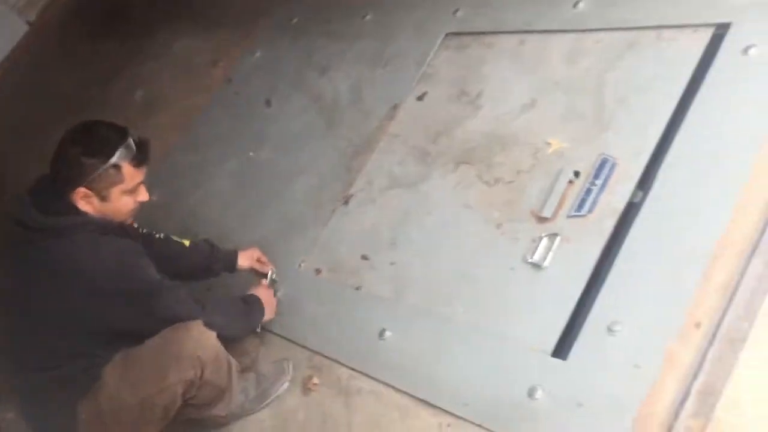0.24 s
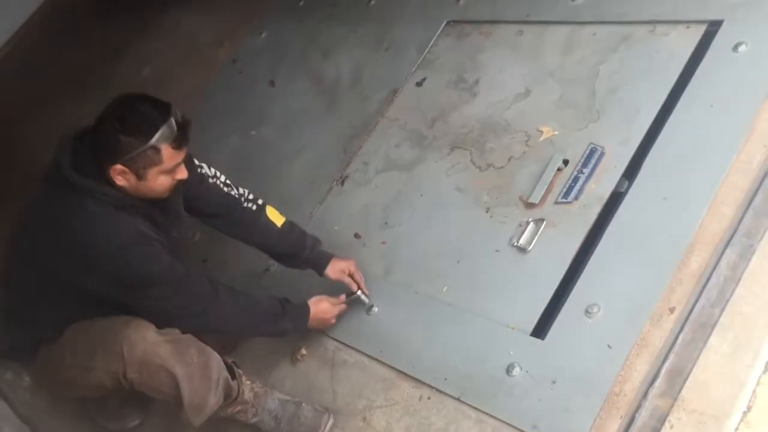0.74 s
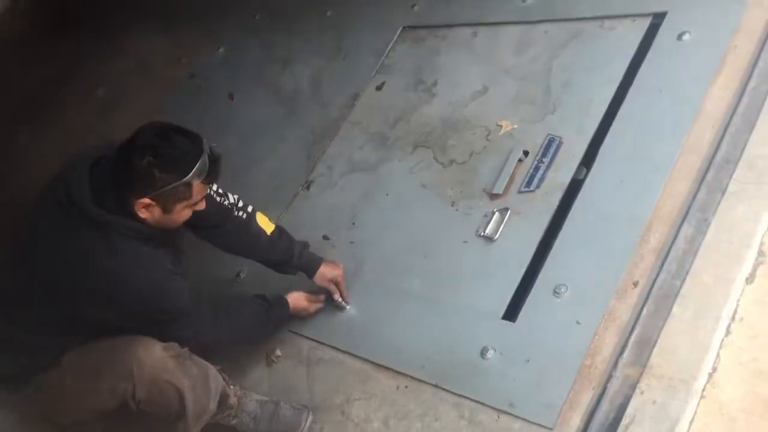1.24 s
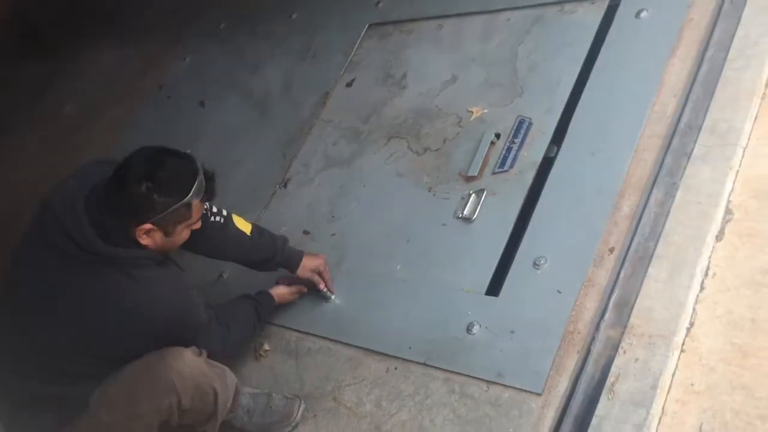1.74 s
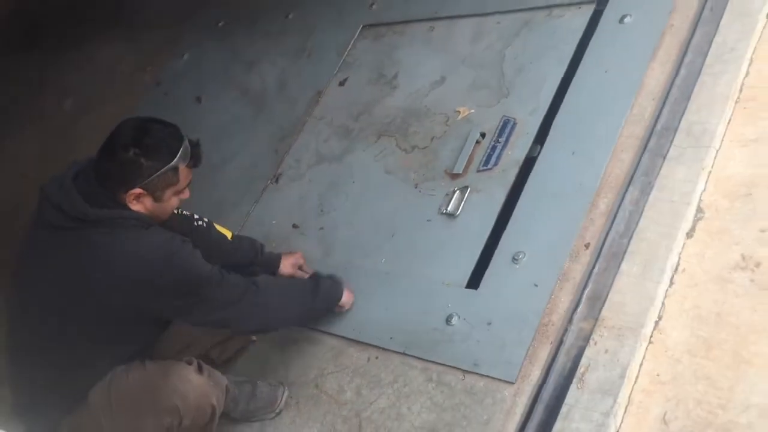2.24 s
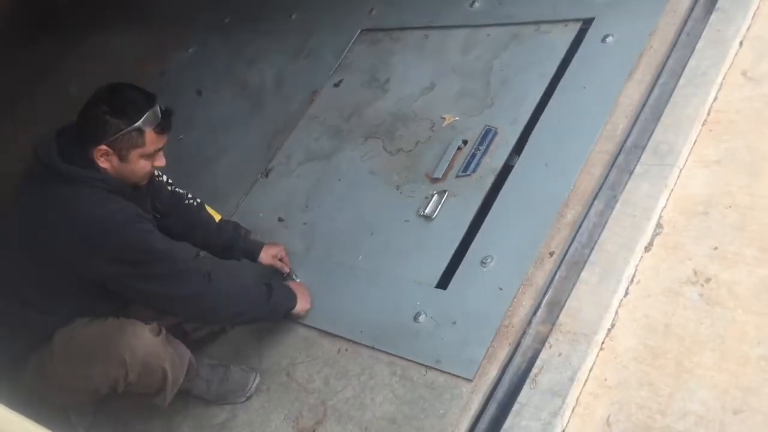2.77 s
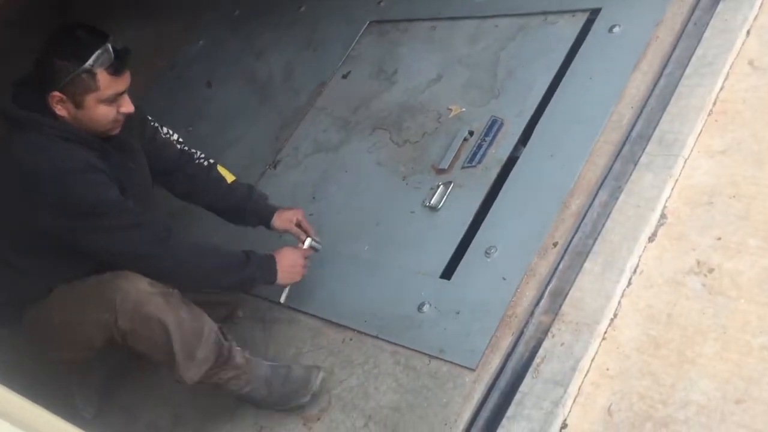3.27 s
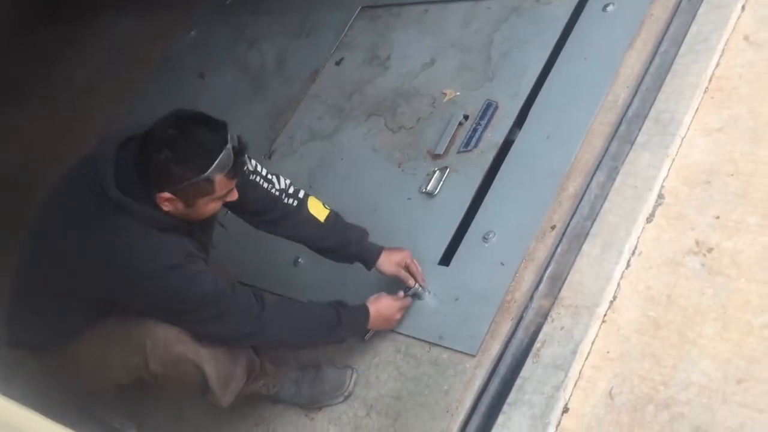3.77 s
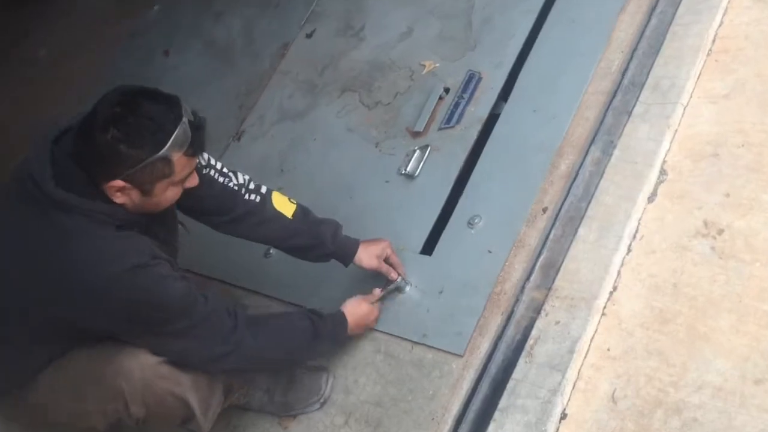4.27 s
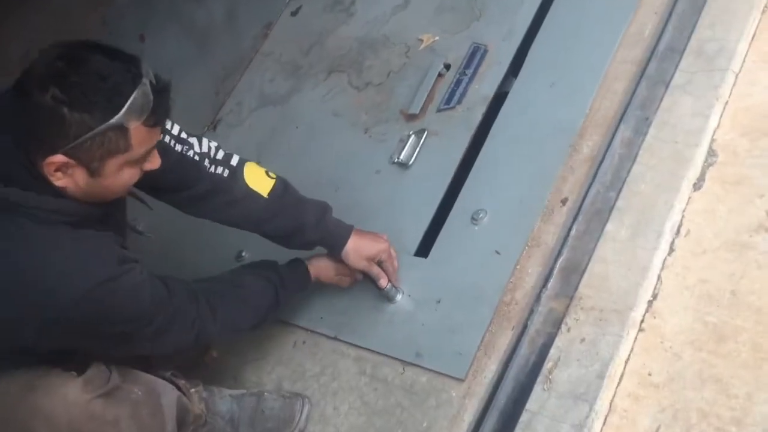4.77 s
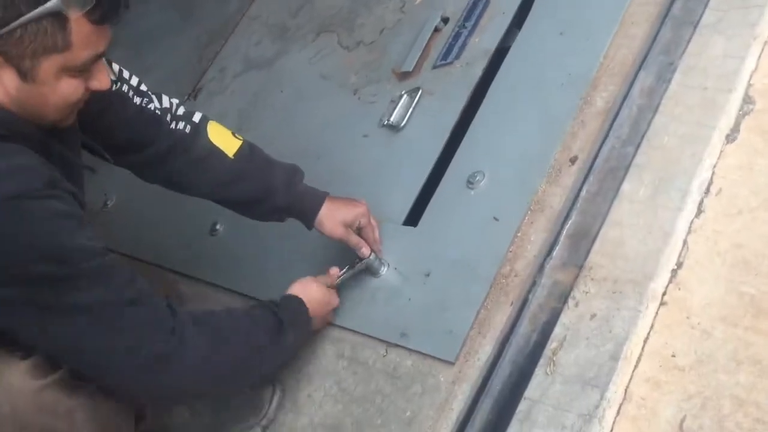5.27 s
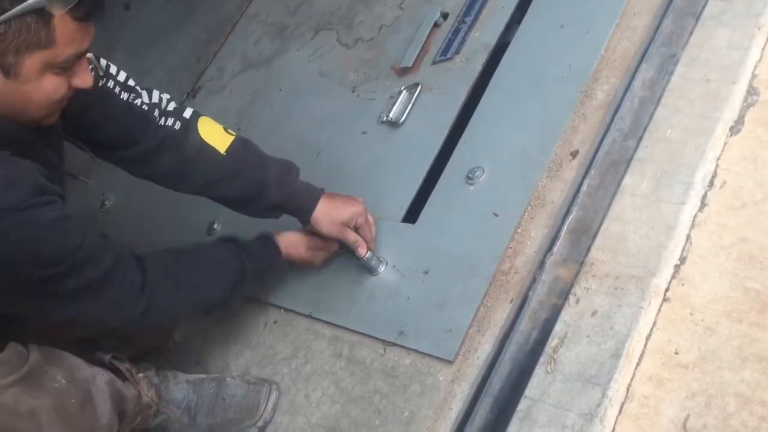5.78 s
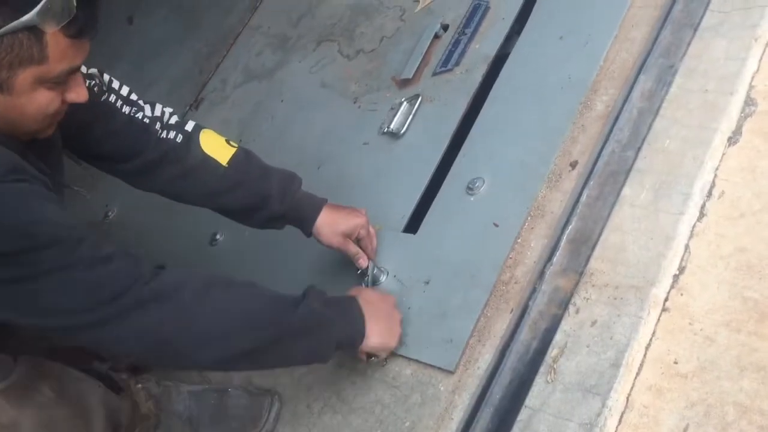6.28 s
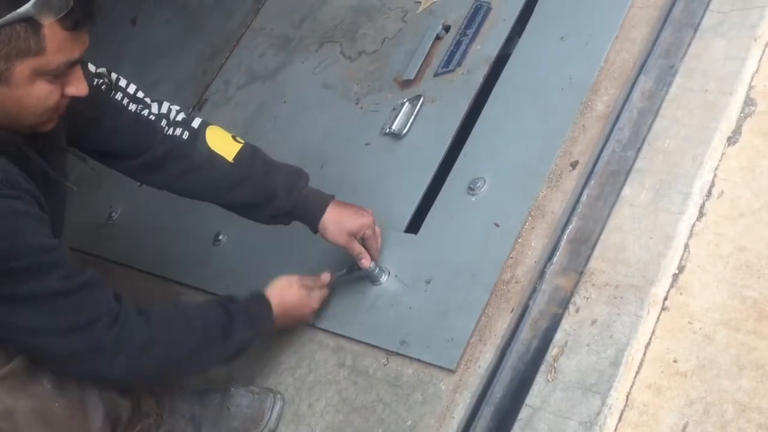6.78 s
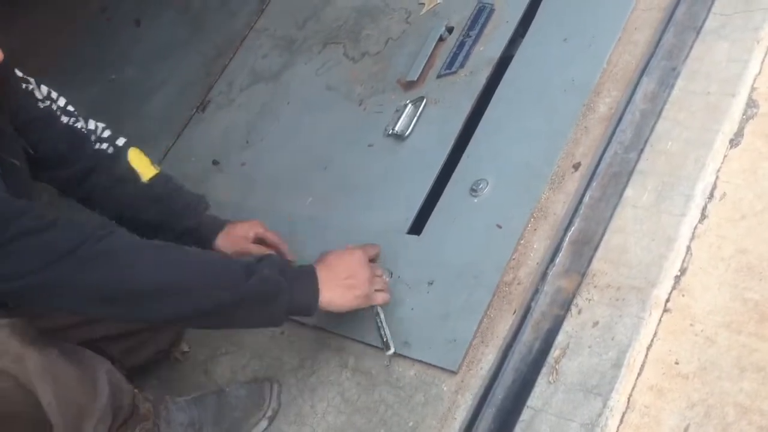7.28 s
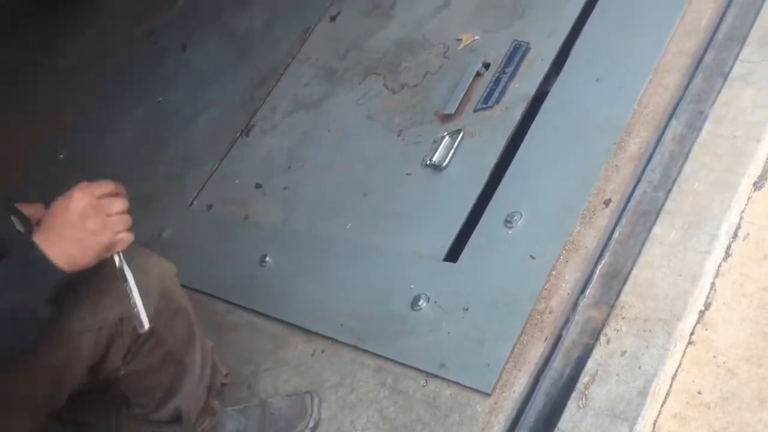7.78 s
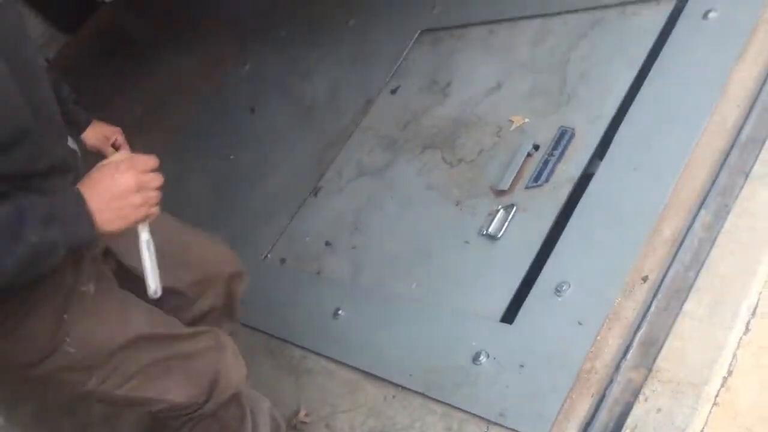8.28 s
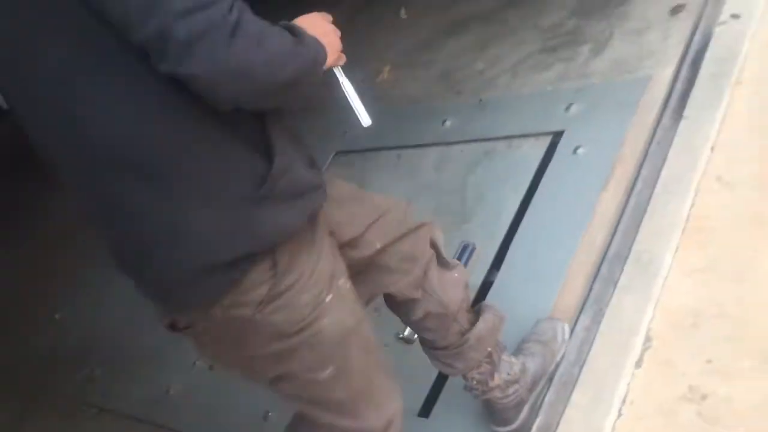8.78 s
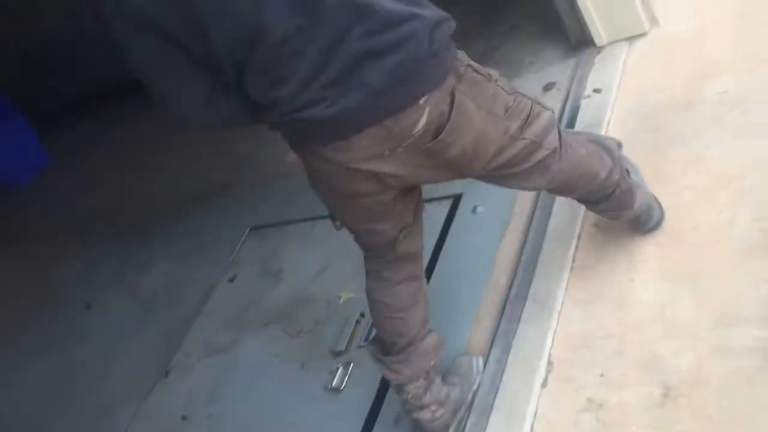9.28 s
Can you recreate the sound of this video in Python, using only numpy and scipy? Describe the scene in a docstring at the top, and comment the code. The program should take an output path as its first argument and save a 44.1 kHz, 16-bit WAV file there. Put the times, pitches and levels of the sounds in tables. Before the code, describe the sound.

In a garage, a hand ratchet loosens tight bolts on a steel floor lid. Soft fast ticking alternates with sudden ringing cracks and one short harsh squeak. Later pulls crack louder, creak roughly and give a clean brief squeal. The wrench clinks off, clothes rustle, grit scuffs and a boot lands. A nearby single microphone catches short bright reverberation and faint rumble.

```python
"""A ratchet wrench loosens tight bolts on a steel floor lid in a garage.
The pawl ticks on each back swing; in the pulls the threads crack, once with a short harsh squeak.
Later pulls crack again, then creak and squeak by stick-slip friction, and a clean squeal rings out.
Last the wrench clinks as it is lifted off, and the worker gets up with rustling clothes and footfalls.
Impacts are noise bursts through resonances; friction is jerky pulses or a wavering harmonic tone."""
import sys
import numpy as np
from scipy import signal
from scipy.fft import rfft, irfft, next_fast_len
from scipy.io import wavfile
from scipy.ndimage import map_coordinates

SR = 44100
rng = np.random.default_rng(int(sys.argv[2]) if len(sys.argv) > 2 else 0)


def master(y):
    """Save y as 16-bit WAV."""
    cut = np.clip(np.atleast_2d(y).T, -1, 1)
    pcm = np.round(cut * 32767)  # scale
    wavfile.write(sys.argv[1], SR, pcm.astype(np.int16))


N = 419832

# colour of grinding steel: frequency_hz, gain_db
GRINDING_COLOUR = [(300, -21), (1200, -13), (2400, -0.5), (4700, 3.5), (6800, -7.5), (9000, -16),
                   (15500, -38.5)]
# colour of a boot sole on the floor: frequency_hz, gain_db
SOLE_COLOUR = [(180, -61), (300, -5.5), (715, -8), (1200, -11), (3460, -14.5), (4330, -12.5), (6270, -43.5),
               (14000, -48)]


def amp(db):
    """Amplitude gain is ten to the power of decibels over twenty."""
    return 10 ** (np.asarray(db) / 20)


def unit(x):
    """Normalise the effective (rms) amplitude to 1."""
    return x / np.sqrt(np.mean(x ** 2) + 1e-20)


def along(points, hz):
    """Interpolate (frequency_hz, value) points on a logarithmic frequency axis."""
    point_hz, values = np.transpose(points)
    return np.interp(np.log(hz + 1), np.log(point_hz + 1), values)


def curves(rows):
    """Interpolate each column linearly in time, from the first row's time to the last."""
    row_s, *columns = np.transpose(rows)
    t = np.arange(row_s[0], row_s[-1], 1 / SR)
    return [np.interp(t, row_s, column) for column in columns]


def level(rows):
    """Gain over the whole scene, linear in decibels between (time_s, level_db) rows."""
    return amp(np.interp(np.arange(N) / SR, *np.transpose(rows)))


def wobble(rate, size):
    """Smooth random fluctuation: a spline through normal deviates, rate knots per second."""
    knots = rng.standard_normal(int(size * rate / SR) + 4)
    return map_coordinates(knots, [np.arange(size) * rate / SR])


def filtered(x, response):
    """Linear filtering: the spectrum is multiplied by a complex response of frequency."""
    padded = next_fast_len(len(x) + 4096)
    spectrum = rfft(x, padded) * response(np.fft.rfftfreq(padded, 1 / SR))
    return irfft(spectrum, padded)[:len(x)]


def noise(spectrum, size):
    """Random noise of rms 1, coloured by a (frequency_hz, gain_db) spectrum."""
    return unit(filtered(rng.standard_normal(size), lambda hz: amp(along(spectrum, hz))))


def resonance(f, centre, width):
    """Causal response of one damped mode; its bandwidth sets how fast it dies."""
    return 1j * f * width / (centre ** 2 - f * f + 1j * f * width)


def fade(t60, size, attack=0.00036):
    """Quick rise, then exponential decay by 60 dB in t60 seconds."""
    t = np.arange(size) / SR
    return (1 - np.exp(-t / attack)) * amp(-60 * t / t60)


def add(track, s, sound):
    """Superposition: mix a sound into the track from time s, or from the start if s is negative."""
    part = track[max(round(s * SR), 0):][:len(sound)]
    part += sound[:len(part)]


def garage(x, wet_db, dull_hz=12000, build=0.00071):
    """Reverberation: a diffuse tail with weakened treble, whose decay time depends on frequency."""
    # reverberation time of the garage: frequency_hz, t60_s
    decay_times = [(150, 0.13), (600, 0.65), (2000, 0.73), (4300, 0.66), (7000, 0.73), (14000, 0.22)]
    hz, t, z = signal.stft(rng.standard_normal(SR), SR, nperseg=256)
    decay = amp(-60 * t / along(decay_times, hz)[:, None]) * (1 - np.exp(-t / build))
    tail = signal.istft(z * decay, SR, nperseg=256)[1]
    tail = amp(wet_db) * tail / np.linalg.norm(tail)
    response = filtered(tail, lambda f: 1 / (1 + 1j * f / dull_hz))
    response[0] += 1  # direct sound
    return signal.fftconvolve(x, response)


def lid(force, modes_db=-2):
    """Modal density: a force excites the plate's crowd of modes, a few standing out; rms 1."""
    # broad colour of the crowded plate modes: frequency_hz, gain_db
    crowd_colour = [(90, -54), (220, -18.5), (400, -17.5), (600, -18.5), (850, -16), (1200, -8.5),
                    (1550, -3.5), (1950, 0.5), (2500, 2), (3300, -5), (4450, -2), (5700, -19.5),
                    (7500, -27.5), (15500, -34)]
    # modes that stand out: frequency_hz, width_hz, gain_db
    strong_modes = [(1488, 7.5, 7), (1715, 14, 7.5), (1910, 8, 0), (1993, 12, 2), (2412, 36, -3.5),
                    (3140, 12, 4), (4148, 340, 0), (4370, 60, 1), (4400, 21, 5.5), (4680, 20, 4)]
    crowd = filtered(force, lambda hz: amp(along(crowd_colour, hz)))
    strong = filtered(crowd, lambda f: sum(resonance(f, hz, width) * amp(db)
                                           for hz, width, db in strong_modes))
    return unit(unit(crowd) + amp(modes_db) * unit(strong))


def ring(hz, width_hz, size):
    """Resonance: random shaking passes twice through one mode; rms 1."""
    return unit(filtered(rng.standard_normal(size), lambda f: resonance(f, hz, width_hz) ** 2))


def contact(t60, size):
    """Impact of steel on steel: a brief snap on top of the exponential ring-out."""
    return fade(t60, size) + amp(4) * fade(0.0049, size)


def swells(rows, rest_db):
    """Gain that follows the speed of a movement: it gathers, peaks early and comes to rest."""
    t = np.arange(N) / SR
    gain = amp(rest_db)
    for start_s, length_s, db in rows:
        peak_s = start_s + 0.22 * length_s
        speed = np.interp(t, [start_s, peak_s, start_s + length_s], [0, 1, 0])
        gain = gain + amp(db) * np.sin(np.pi / 2 * speed)
    return gain


def stick_slip(rows, tone, jitter, grind, flutter_db):
    """Friction locks onto a pitch; roughness shakes its period and overtones and adds grinding."""
    hz, db, rough = curves(rows)
    size = len(hz)
    shaken_hz = hz * (1 + jitter * rough * wobble(900, size))
    phase = 2 * np.pi * np.cumsum(shaken_hz) / SR
    note = unit(sum(amp(gain + flutter_db * rough * wobble(120, size)) * np.sin(round(k) * phase)
                    for k, gain in tone))
    share = np.clip(grind * rough, 0, 1)
    return amp(db) * (np.sqrt(1 - share ** 2) * note + share * noise(GRINDING_COLOUR, size))


def cracks(size=8000, upper_hz=5300, upper_db=-12):
    """Sudden release: each slip of the thread shakes the lid and rings the bolt, plus a fixed upper mode."""
    # the thread breaks loose: start_s, level_db, ring_t60_s, ring_pitch_hz, ring_db
    slips = [(.926, -22, 0.056, 2740, 8), (0.931, -27, 0.067, 5130, -9), (.951, -25.5, 0.1, 2700, 1),
             (.995, -32.5, 0.1, 2440, -1), (1.270, -19, 0.013, 4100, 8), (1.274, -26, 0.17, 4180, -0.5),
             (1.316, -27, 0.1, 1720, -0.5), (1.981, -20, 0.11, 4280, 5), (3.797, -23.5, 0.35, 3780, -6),
             (3.809, -24, 0.043, 3430, 13.5), (4.136, -39, 0.17, 3070, -6.5), (4.146, -11.5, 0.1, 3200, -9),
             (4.188, -26, 0.22, 1815, -18.5), (5.137, -16.5, 0.08, 2560, -13), (6.063, -32, .04, 3200, 1.5),
             (6.074, -24, 0.15, 3170, -2.5)]
    out = np.zeros(N)
    for start_s, db, t60, hz, ring_db in slips:
        bolt = ring(hz, 650, size) + amp(upper_db) * ring(upper_hz, 730, size)
        steel = unit(lid(rng.standard_normal(size)) + amp(ring_db) * bolt)
        add(out, start_s, garage(amp(db) * steel * contact(t60, size), wet_db=-5.5))
    return out


def creak(scatter=0.099, size_db=3, grind_db=-2, bright_db=-5, groan_hz=610, groan_db=-32):
    """Stick-slip in uneven jerks under full load, with grinding and a low groan of the plate."""
    # course of the long creak: time_s, slips_per_s, level_db, roughness (about 0 to 1)
    course = [(5.136, 376, -25.5, 1.05), (5.16, 500, -11.5, 0.78), (5.191, 483, -10, 0.42),
              (5.228, 466, -15, 0.42), (5.247, 570, -22, 0.5), (5.292, 410, -47.5, 0.65)]
    out = np.zeros(N)
    rate, db, rough = curves(course)
    size = len(rate)
    turns = np.cumsum(rate) / SR + scatter * rough * wobble(400, size)
    # one pulse each time the slip count passes a whole number
    pulses = np.diff(np.floor(turns), prepend=0).clip(0)
    slips = pulses * amp(size_db * wobble(500, size))
    # bending waves travel slower at low pitch, which smears every jerk into a chirp
    smeared = filtered(slips, lambda hz: np.exp(-2j * np.sqrt(hz)))
    steel = lid(unit(smeared) + amp(grind_db) * rough * rng.standard_normal(size))
    groan = amp(groan_db) * ring(groan_hz, 230, size)
    grinding = amp(bright_db) * rough * noise(GRINDING_COLOUR, size)
    add(out, course[0][0], garage(amp(db) * (steel + groan + grinding), wet_db=-5.5))
    return out


def squeaks():
    """Rough stick-slip tones as the bolt starts to turn: one harsh, then short glides that swell and fade."""
    # course of the first, harsh squeak: time_s, pitch_hz, level_db, roughness (0 to 1)
    harsh_course = [(1.98, 1348, -35.5, 0.63), (1.995, 1417, -21.5, 0.58), (2.001, 1298, -19.5, 0.52),
                    (2.009, 1262, -20.5, 0.5), (2.024, 1260, -46, 0.3)]
    # its overtones: multiple, gain_db
    harsh_tone = [(1, 2), (2, 3), (3, 2), (4, 2), (5, -12.5), (7, -12.5)]
    # run of squeaks in one pull: start_s, length_s, first_pitch_hz, last_pitch_hz, level_db, roughness (0 to 1)
    run = [(5.357, 0.084, 1333, 1258, -25, 0.62), (5.427, 0.016, 1165, 1181, -22, 0.5),
           (5.446, 0.032, 1213, 1214, -17, .33), (5.473, 0.037, 1297, 1326, -15, .22)]
    # how bolt and wrench colour the overtones: frequency_hz, gain_db
    body_colour = [(1250, -17), (2420, 0), (2650, -5), (3600, -2), (3930, 4.5), (4850, -0.5), (5250, -7),
                   (6100, -12.5), (7500, -30.5), (11500, -36.5)]
    out = np.zeros(N)
    harsh = stick_slip(harsh_course, harsh_tone, jitter=.09, grind=.85, flutter_db=5)
    add(out, harsh_course[0][0], garage(harsh, wet_db=-3))
    # share of the length, level in dB
    shape = [(0, -11.5), (0.061, 0), (0.81, 0), (1, -11.5)]
    for start_s, length_s, first_hz, last_hz, db, rough in run:
        course = [(share * length_s, first_hz + share * (last_hz - first_hz), db + edge_db, rough)
                  for share, edge_db in shape]
        tone = [(k, along(body_colour, k * last_hz)) for k in range(1, 10)]
        squeak = stick_slip(course, tone, jitter=.065, grind=1.2, flutter_db=7)
        add(out, start_s, garage(squeak, wet_db=-4.5))
    return out


def squeal(pitch_hz=1398, waver=.006):
    """Sustained friction tone; modulation at its pitch splits a second mode into sidebands."""
    # clean squeal, rising as the pressure eases: time_s, pitch_hz, level_db, roughness (0 to 1)
    course = [(6.095, 1400, -44, .3), (6.113, 1448, -25.5, .22), (6.124, 1392, -20, .14),
              (6.145, 1398, -15, .06), (6.168, 1400, -17.5, .06), (6.19, 1398, -20.5, .1),
              (6.204, 1420, -28, .18), (6.226, 1438, -27, .18), (6.25, 1430, -44, .25)]
    # its overtones: multiple, gain_db
    tone = [(1, -6.5), (2, 0), (3, -11), (4, -31), (5, -43), (6, -44), (7, -41), (8, -46)]
    # second mode of the bolt: time_s, pitch_hz, level_db
    second_mode = [(6.155, 5055, -62), (6.178, 5058, -31), (6.2, 5068, -34), (6.232, 5140, -62)]
    # sidebands: squeal pitches away from the second mode, gain_db
    sidebands = [(-2, -6), (-1, -8), (0, -1), (1, -16), (2, -20), (3, -15), (4, -19), (5, -25), (6, -26),
                 (7, -31)]
    out = np.zeros(N)
    clean = stick_slip(course, tone, jitter=.12, grind=.8, flutter_db=12)
    add(out, course[0][0], garage(clean, wet_db=-7.5))
    hz, db = curves(second_mode)
    second_phase = 2 * np.pi * np.cumsum(hz) / SR
    wavering_hz = pitch_hz * (1 + waver * wobble(240, len(hz)))
    squeal_phase = 2 * np.pi * np.cumsum(wavering_hz) / SR
    whistle = sum(amp(gain) * np.sin(second_phase + round(k) * squeal_phase) for k, gain in sidebands)
    add(out, second_mode[0][0], garage(amp(db) * whistle, wet_db=-7))
    return out


def ratchet(size=1500, scatter_db=3, uneven=.06):
    """Repeated impacts: the pawl drops from tooth to tooth, strongest about midway in the back swing."""
    # back swings: start_s, length_s, teeth, extra gap at the end (share), tick level_db before the gain below
    swings = [(0.106, 0.058, 4, 0, -42), (1.364, .064, 3, 0, -42), (2.386, 0.233, 14, .9, -38),
              (4.348, 0.227, 10, -.1, -37.5), (5.693, .2, 12, 0, -37.5), (6.477, 0.214, 14, .55, -34.5)]
    # colour of a tick: frequency_hz, gain_db
    tick_colour = [(300, -69), (1200, -4), (2400, 2), (4400, 6), (5300, -1), (6500, -21), (8000, -19),
                   (9100, -8), (10300, -21.5), (15000, -19.5)]
    gain_db, edge_db, t60 = 8, -5, .009  # dB, dB at either end of a swing, s
    out = np.zeros(N)
    for start_s, length_s, teeth, brake, db in swings:
        way = np.linspace(0, 1, round(teeth))
        gap, strength = rng.standard_normal((len(way), 2)).T
        # a positive share widens the last gaps as the hand brakes
        travel = np.cumsum(1 + brake * way ** 3 + uneven * gap)
        times = start_s + length_s * (travel - travel[0]) / np.ptp(travel)
        tick_levels = db + gain_db + edge_db * (2 * way - 1) ** 2 + scatter_db * strength
        for tick_s, tick_db in zip(times, tick_levels):
            add(out, tick_s, amp(tick_db) * noise(tick_colour, size) * fade(t60, size))
    return garage(out, wet_db=0, dull_hz=7000)[:N]


def clinks(size=3000):
    """Damped impact: the hand-held wrench touches the bolt head and rings only briefly."""
    # contacts: start_s, level_db before a 0.5 dB cut, ring_pitch_hz, room_db
    touches = [(1.462, -34, 4300, -29), (1.912, -46, 2400, -8), (2.776, -47.5, 2720, 3),
               (2.908, -45, 2800, 0.5), (3.020, -44.5, 2880, -7), (3.053, -42, 1650, -7),
               (5.875, -32.5, 4460, 0.5), (7.099, -25, 2660, -4.5), (7.156, -35, 4040, -14),
               (7.205, -44.5, 2710, -16), (7.255, -32.5, 3170, -5), (7.302, -32, 4220, -8.5),
               (8.348, -46.5, 1920, -6), (8.38, -45.5, 3800, -19)]
    out = np.zeros(N)
    for start_s, db, hz, wet_db in touches:
        steel = unit(lid(rng.standard_normal(size)) + 0.93 * ring(hz, 1050, size))
        add(out, start_s, garage(amp(db - 0.5) * steel * contact(0.026, size), wet_db))
    return out


def knocks(size=5000):
    """Dull impact: decaying coloured noise as the wrench handle and the hand bump the lid."""
    # bumps: start_s, level_db
    bumps = [(1.318, -30.5), (5.677, -30.5), (6.806, -37), (6.821, -39.5), (7.101, -30.5), (7.206, -40.5)]
    # colour of a bump: frequency_hz, gain_db
    bump_colour = [(120, -33), (270, -2), (450, -5), (700, -3), (1000, -2.5), (2200, 5), (3200, -1.5),
                   (4500, -6), (10000, -43)]
    out = np.zeros(N)
    for start_s, db in bumps:
        add(out, start_s, garage(amp(db) * noise(bump_colour, size) * fade(0.073, size), wet_db=-1.5))
    return out


def panel(x):
    """Sympathetic resonance: x sets the lid's slow bending modes ringing."""
    # bending modes: frequency_hz, width_hz, gain_db
    bending_modes = [(269, 1.9, 12), (620, 4.9, 8), (664, 7.2, 9), (1010, 11, -5.5)]
    return filtered(x, lambda f: sum(amp(db) * resonance(f, hz, width) for hz, width, db in bending_modes))


def steps(size=5000):
    """Soft impact: a dull slap over a low, longer thud, and grit cracking under a sole."""
    # knees and boots meet the floor: start_s, slap_db, thud_db
    footfalls = [(3.417, -32, -36.5), (3.544, -33, -40.5), (3.599, -56.5, -37.5), (8.492, -38.5, -60),
                 (8.574, -47, -53), (8.838, -38, -52), (9.322, -19.5, -32.5), (9.335, -27.5, -62)]
    # colour of the floor under a step: frequency_hz, gain_db
    thud_colour = [(30, -15.5), (80, 5), (280, 2.5), (700, -43), (2000, -62.5)]
    # a sole scuffs over grit: start_s, level_db
    grit = [(8.765, -27.5), (8.777, -23), (8.789, -36), (8.816, -33), (8.834, -42), (9.302, -37)]
    out = np.zeros(N)
    for start_s, slap_db, thud_db in footfalls:
        slap = amp(slap_db) * noise(SOLE_COLOUR, size) * fade(0.023, size, attack=0.0013)
        thud = amp(thud_db) * noise(thud_colour, size) * fade(0.097, size, attack=0.0018)
        add(out, start_s, garage(slap + thud, wet_db=-15.5))
    for start_s, db in grit:
        scuff = lid(rng.standard_normal(size), modes_db=-4) + amp(-7) * noise(SOLE_COLOUR, size)
        scuff = amp(db) * scuff * fade(0.026, size, attack=0.00118)
        add(out, start_s, garage(scuff, wet_db=-10.5))
    return out


def handling(grain_db=3, stroke_db=3, fold_db=3.0, crinkle_db=3):
    """Sliding friction: unevenly modulated noise for rubbed steel, rustling clothes and shuffling soles."""
    # hands and tool rub on the steel: start_s, length_s, level_db
    rubs = [(-.1, 0.4, -50), (.84, 0.14, -56.5), (1.9, 0.18, -56), (2.38, 0.36, -49.5), (2.71, 0.16, -49.5),
            (4.79, 0.085, -52.5), (6.8, 0.34, -54.5), (8.76, 0.16, -44), (8.95, 1, -65.5)]
    # arms and legs shift in the clothes: start_s, length_s, level_db
    moves = [(-.2, 0.66, -54.5), (.5, 0.98, -62), (2.68, 0.47, -64.5), (5.68, 1.2, -61.5),
             (6.05, 0.17, -52), (6.33, 0.48, -62), (6.72, 0.8, -52.5), (8.35, 2.4, -62.5)]
    # colour of rustling cloth: frequency_hz, gain_db
    cloth_colour = [(80, -26), (170, -1.5), (290, 0.5), (480, -10.5), (700, -14), (1500, -15.5),
                    (5000, -51)]
    # soles shuffle as the worker rises: start_s, length_s, level_db
    shuffles = [(8.42, 0.54, -65.5), (8.95, 1, -56)]
    rub_force = rng.standard_normal(N) * amp(grain_db * wobble(150, N) + stroke_db * wobble(10, N))
    rub = swells(rubs, rest_db=-67) * lid(rub_force)
    folds = unit(noise(cloth_colour, N) * amp(fold_db * wobble(25, N) + crinkle_db * wobble(130, N)))
    scrape = unit(noise(SOLE_COLOUR, N) * amp(grain_db * wobble(150, N) + stroke_db * wobble(17, N)))
    soles = swells(shuffles, rest_db=-np.inf) * scrape
    return garage(rub + soles, wet_db=-11.5)[:N] + swells(moves, rest_db=-70) * folds


def background():
    """Broadband and narrow-band noise: uneven low rumble, a swelling high hiss and still air."""
    # low rumble: time_s, level_db before a 5 dB gain
    rumble_course = [(0.0, -65), (4.74, -56.5), (4.96, -65.5), (7.25, -60.5), (7.62, -52.5), (8.2, -62.5),
                     (9.12, -57), (9.52, -61.5)]
    # colour of the rumble: frequency_hz, gain_db
    rumble_colour = [(15, -21.5), (35, -6.5), (55, 6.5), (90, 0.5), (140, -9), (300, -40), (900, -79.5)]
    # the hiss swells as the arms sweep: start_s, length_s, level_db
    swishes = [(.61, 0.13, -63), (.73, 0.14, -62), (2.48, 0.32, -51.5), (3.23, 0.11, -61),
               (3.72, 0.096, -55.5), (4.38, 0.33, -48), (7.46, 0.14, -56.5), (8.42, 0.78, -60)]
    # colour of the narrow hiss: frequency_hz, gain_db
    hiss_colour = [(2500, -33), (3500, -12), (4100, -6), (4600, -4), (5100, -17.5), (6000, -40)]
    # colour of the still air: frequency_hz, gain_db
    air_colour = [(59, -33), (100, -6.5), (438, -33.5), (682, -31), (825, -11.5), (1060, -17.5),
                  (1620, -19), (2750, -36.5), (4280, -28), (6530, -36), (15500, -43.5)]
    rumble = unit(noise(rumble_colour, N) * amp(2.3 * wobble(17, N)))
    rumble = amp(5) * level(rumble_course) * rumble
    hiss = noise(hiss_colour, N) * amp(1.1 * wobble(33, N))
    return rumble + swells(swishes, rest_db=-77) * hiss + amp(-69.0) * noise(air_colour, N)


def scene():
    """Superposition at one microphone; wrench, bolt and knock sounds also excite the lid's bending modes."""
    steel = cracks() + creak() + squeaks() + squeal() + ratchet() + clinks() + knocks()
    return (steel + panel(steel) + steps() + handling() + background())[None]


def record(dry, top=0.55):
    """Saturation and band limit: the recorder rounds off the highest peaks and cuts the top treble."""
    rounded = dry[0] / (1 + np.abs(dry[0] / top) ** 6) ** (1 / 6)
    return filtered(rounded, lambda hz: hz < 15900)[None]


dry = scene()
out = record(dry)
master(out)
```